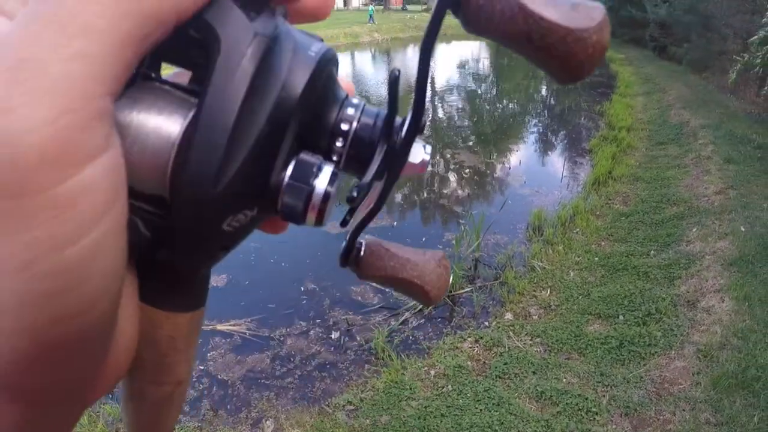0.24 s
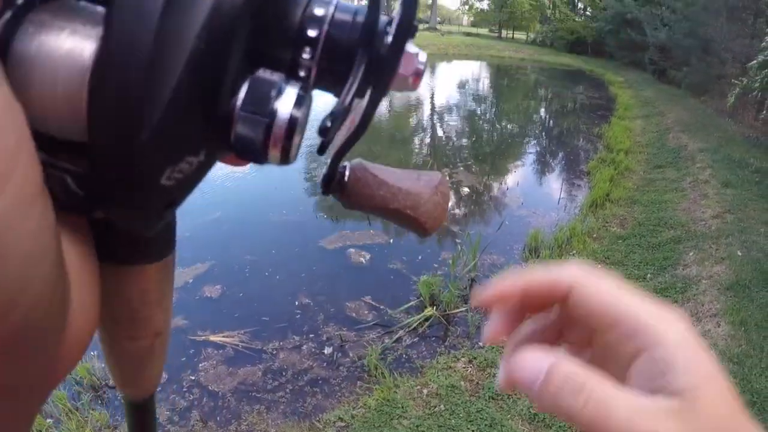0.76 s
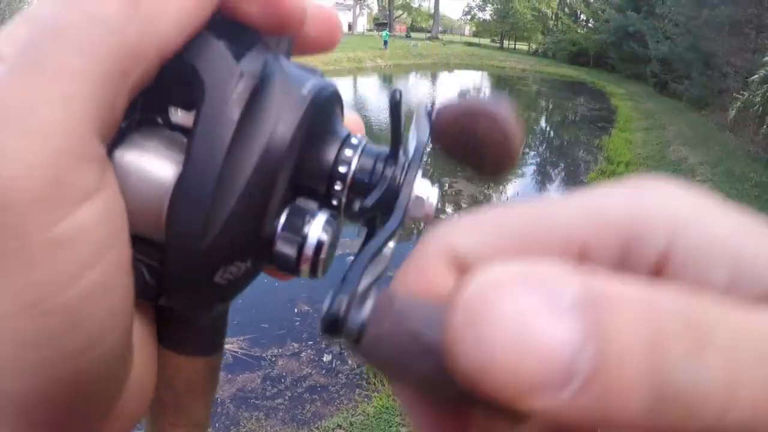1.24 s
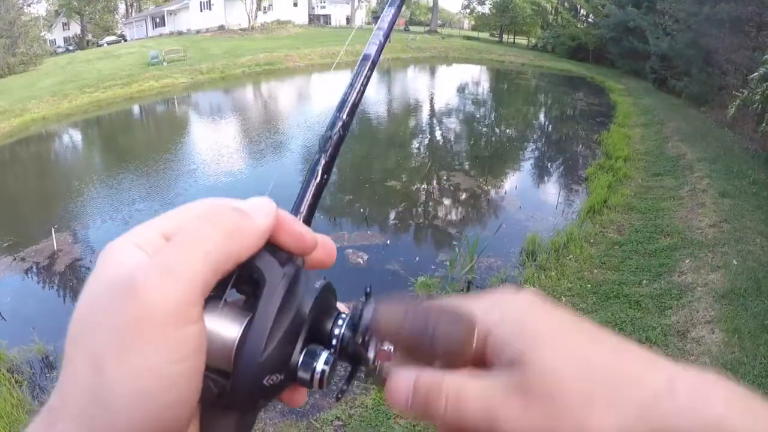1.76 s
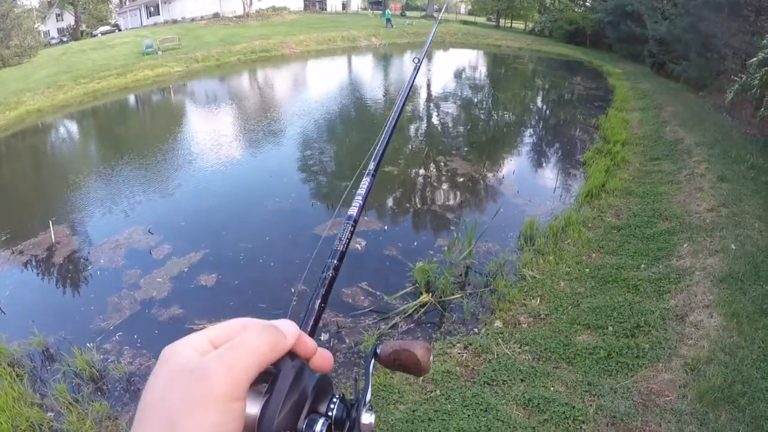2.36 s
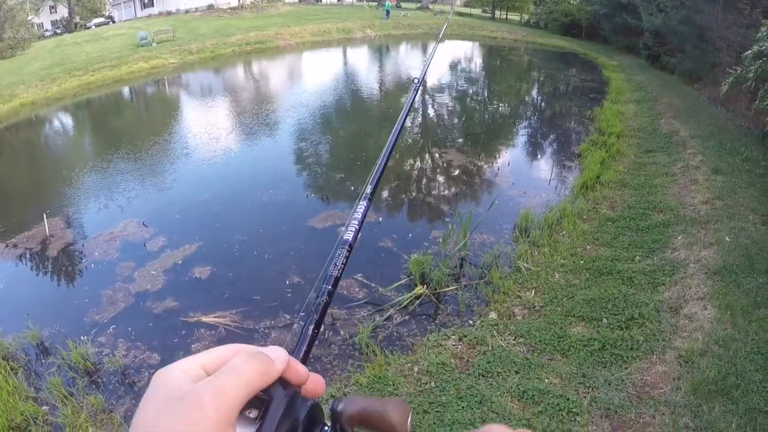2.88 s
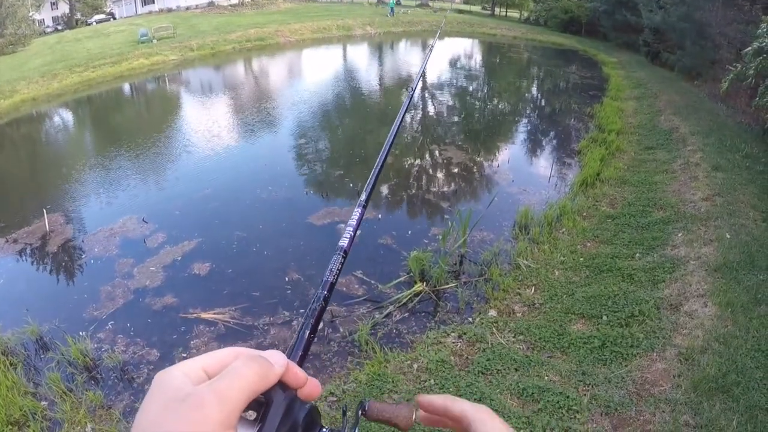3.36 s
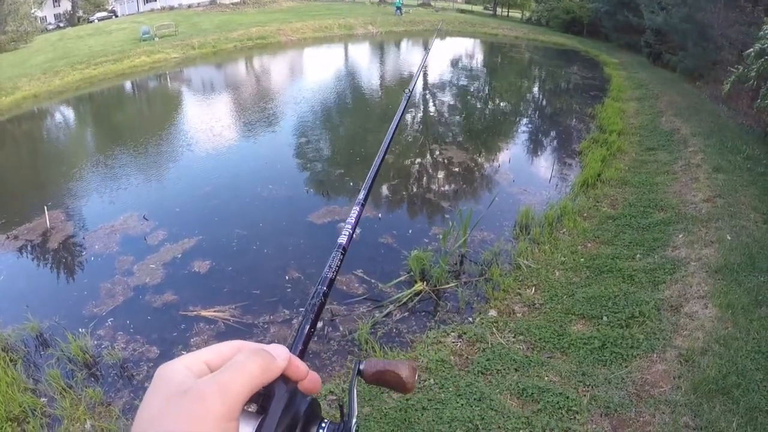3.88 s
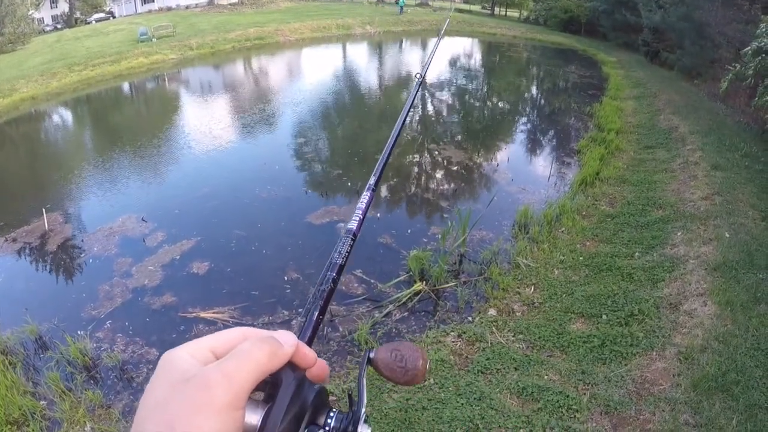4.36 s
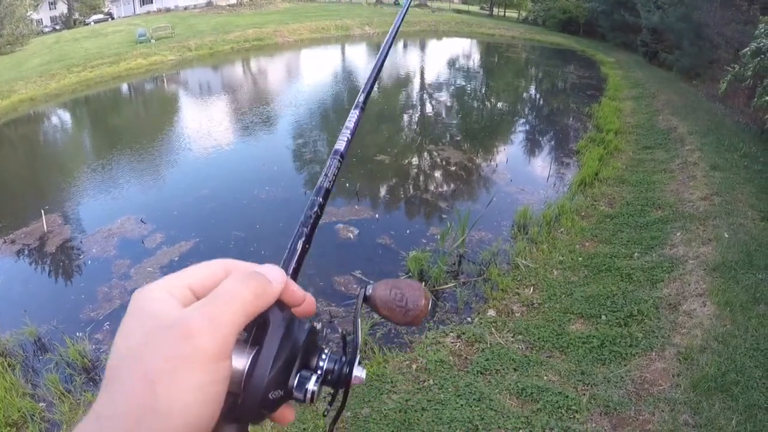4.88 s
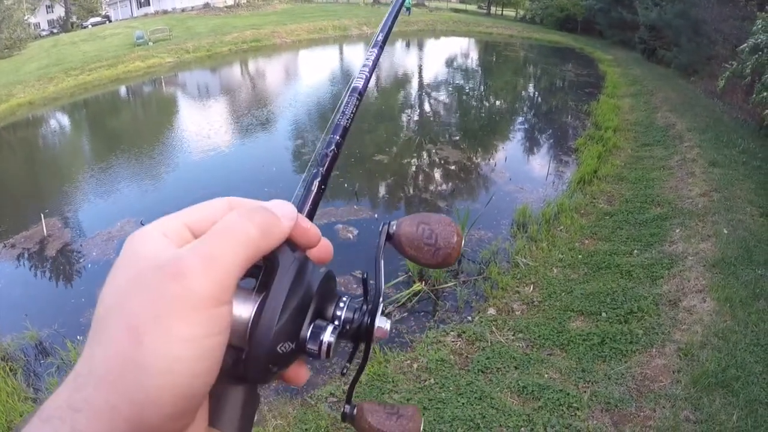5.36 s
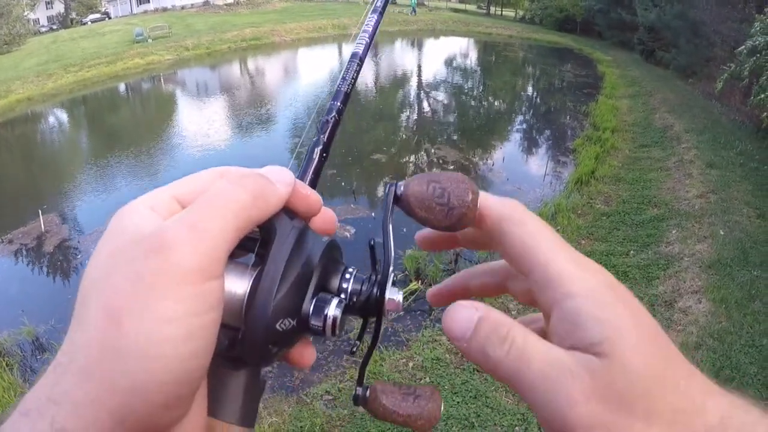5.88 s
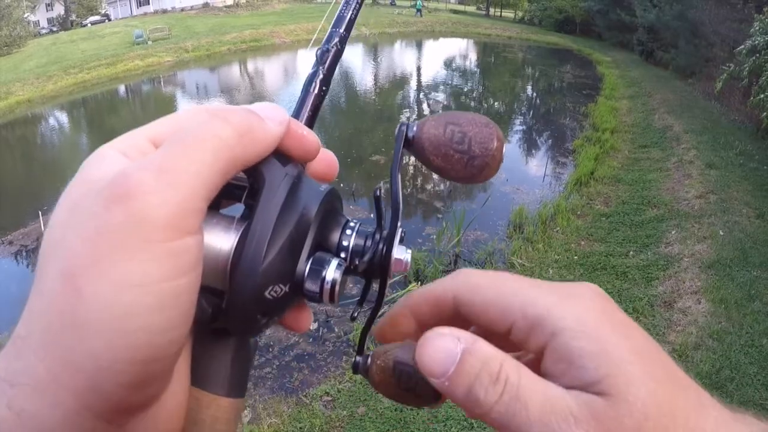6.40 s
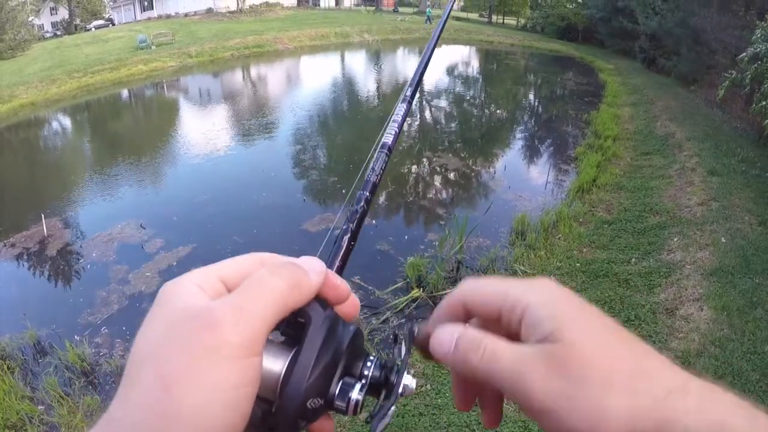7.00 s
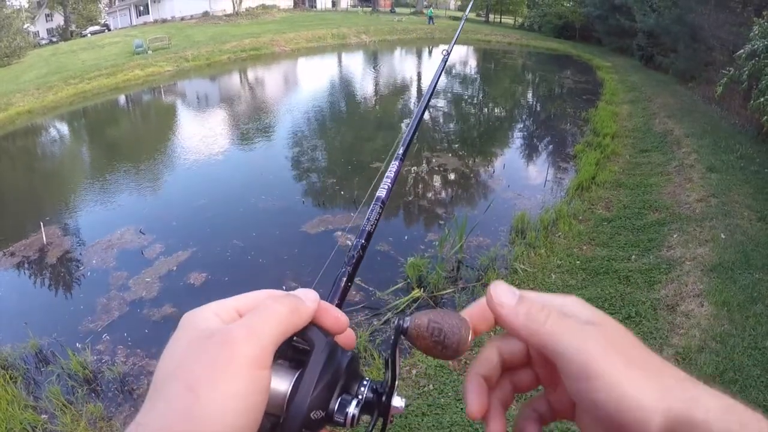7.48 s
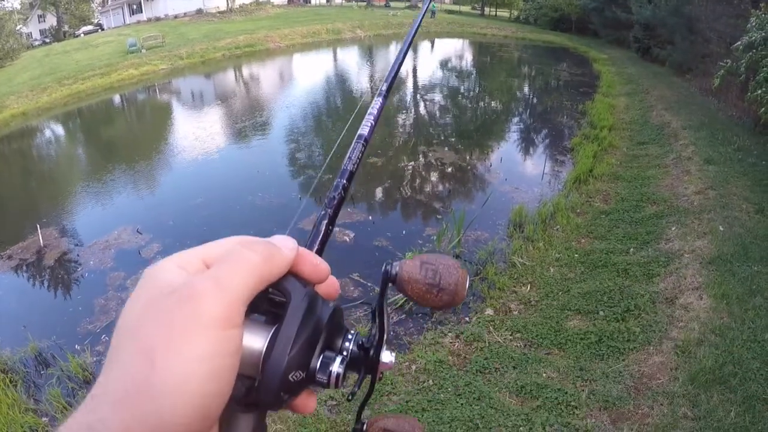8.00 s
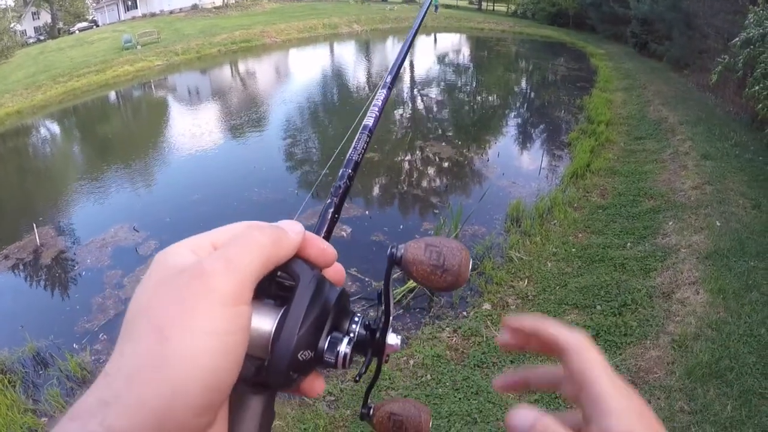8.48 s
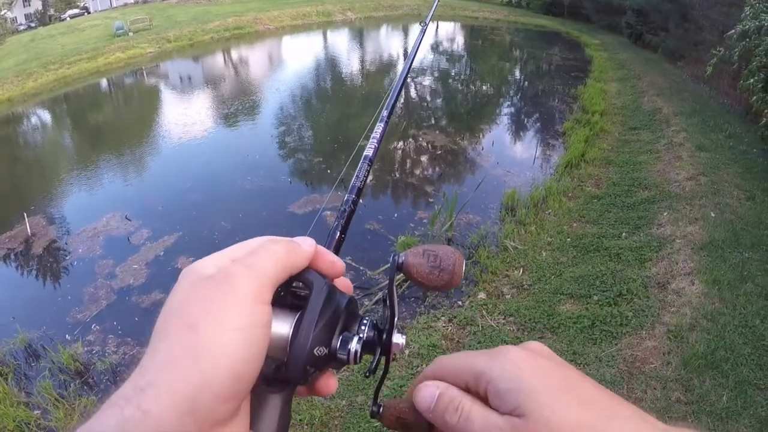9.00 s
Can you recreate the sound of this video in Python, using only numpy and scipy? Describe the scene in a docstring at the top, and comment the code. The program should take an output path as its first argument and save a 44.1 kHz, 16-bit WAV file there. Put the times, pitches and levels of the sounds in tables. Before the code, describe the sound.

Outdoors beside a pond, a distant vehicle holds a low droning exhaust note, then sweeps up to a buzzing, raspy pull. It drops at an upshift with a soft puff and spits, throbs on, shifts again lower and fades away. Houses and trees echo it faintly. Early on, fingers faintly brush a fishing reel, which clicks sharply close to the microphone, right of centre. Wind rumble lulls, then returns in small gusts.

```python
"""Vehicle receding from a pond

A six-cylinder vehicle accelerates some way off, shifts up twice and fades into the distance.
The exhaust note is a harmonic series on the firing rate, with orders between the harmonics and spurts of
gas noise; delayed copies are its echoes off houses and trees. Coloured noise gives the road haze, the light
wind on the microphone, the leaves and a faint hiss. Close by, fingers brush a fishing reel, whose clicks
excite a bank of decaying resonances."""
import sys
import numpy as np
from scipy import signal
from scipy.fft import rfft, irfft, next_fast_len
from scipy.io import wavfile

SR = 44100
rng = np.random.default_rng(int(sys.argv[2]) if len(sys.argv) > 2 else 0)


def pcm_store(signal):
    """Save signal as 16-bit PCM."""
    levels = np.round(np.clip(np.atleast_2d(signal), -1, 1) * 32767)
    wavfile.write(sys.argv[1], SR, levels.astype(np.int16).T)


N = 407469
T = np.arange(N) / SR   # time axis, s
PADDED = next_fast_len(N, True)
BINS = np.maximum(np.arange(PADDED // 2 + 1) * SR / PADDED, 1)   # frequency axis, Hz


# Engine speed: a slow pull, a run-up and two upshifts. Each row: time [s], firing rate [Hz].
ENGINE_SPEED = [(0, 86.75), (.14, 96.3), (.36, 100.7), (.6, 103.6), (.8, 104.9), (2.2, 106.6),
                (2.89, 108.3), (3.05, 130), (3.29, 179.1), (3.42, 195.2), (3.55, 205.3), (3.88, 213.1),
                (4.3, 225.9), (4.8, 235.6), (4.99, 238), (5.06, 224.7), (5.17, 193.7), (5.42, 165.5),
                (6.37, 175.8), (6.55, 172.7), (6.84, 169.2), (7.08, 141.6), (7.3, 140.2), (7.6, 130.7),
                (7.9, 128.9), (8.4, 117.3)]
# The two clean tones of the exhaust note. Each row: time [s], firing tone [dB], its octave [dB].
TONE_LEVELS = [(0, -25, -39.5), (.12, -18.5, -40.5), (.38, -26, -31.5), (.6, -18, -38.5),
               (2.03, -18.5, -38), (2.9, -19, -36), (3.2, -25, -43), (3.6, -23, -37.5), (4.07, -22, -42),
               (4.3, -25.5, -34.5), (4.98, -31, -35.5), (5.06, -25, -31.5), (5.17, -22, -42.5),
               (5.28, -21.5, -45), (5.42, -35, -43), (6.43, -31.5, -49.5), (6.62, -48, -54.5),
               (6.85, -43.5, -62), (7.08, -36, -45.5), (7.45, -42, -48), (7.95, -44.5, -55.5),
               (8.35, -52, -51), (8.7, -62, -60.5), (9.24, -77, -60)]
# The octave sags now and then. Each row: time [s], depth [dB], half length [s].
OCTAVE_SAGS = [(2.09, -13, 0.044), (2.617, -14, 0.11), (3.19, -17, .04), (4.038, -13, 0.029),
               (4.475, -18, 0.018), (5.573, -12.5, 0.13)]
# Exhaust colour for the overtones. Each row: frequency [Hz], gain [dB].
OVERTONE_COLOUR = [(200, -28), (300, -3), (360, -1), (425, -5.5), (490, 1), (600, -5), (700, -3),
                   (880, -13), (1100, -33.5), (1600, -39.5)]
# Orders between the firing tones, from unequal cylinders. Each entry: order [sixths of the firing rate].
UNEVEN_SIXTHS = [3, 4, 5, 7, 8, 9, 10, 11, 13, 14, 15, 16, 17, 20, 22]
# Relative strength of each of those orders. Each entry: gain [dB].
UNEVEN_STRENGTH = [3.5, -2, 0, -3.5, 2.5, 4, -1, 1, -5.5, -4.5, -3, 0, -6, 2, 0]
# Exhaust colour for those orders. Each row: frequency [Hz], gain [dB].
UNEVEN_COLOUR = [(30, -29), (80, -33.5), (126, -19), (153, 3.5), (190, -4), (240, -12.5), (280, -15.5),
                 (310, -24.5), (350, -34.5), (470, -12), (570, -16.5), (700, -27.5), (900, -29)]
# Turbulent gas that leaves the pipe with each firing. Each row: frequency [Hz], density [dB per Hz].
GAS_COLOUR = [(400, -21.5), (560, 2), (720, 3.5), (850, 9.5), (940, -2.5), (1040, -19), (1300, -29)]
RASP_DB, EDGE_DB, UNEVEN_DB = -43, -13, -37   # on a light throttle, at the starting distance
GONE_S, FADE_DB_PER_S = 7.28, 8.5   # from here on the rasp and the uneven firing die away
RATTLE_DB = -1.5   # the part of the gas that repeats with each engine cycle, against the random part
DIP_SHARE = 0.2   # how much of each dip in the firing tone the overtones share
OVERRUN_AT_S, OVERRUN_S, BURBLE_DB = 5.24, 0.12, 6   # burble of the overtones while the revs fall
WALL_S, WALL_DB = 0.0596, -21.5   # one house front throws the firing tone back, so it beats in the glides
FAR_ECHO_S, FAR_ECHO_DB = 0.3, -21   # the far tree line holds on to the old pitch after a change of speed


def exhaust(gas_db, flutter_db, jitter, spurt_sharpness):
    """Harmonic series of periodic firing, six per cycle, with sub-orders and modulated turbulence noise."""
    firing_hz, = in_time(ENGINE_SPEED)
    tone_db, octave_db = in_time(TONE_LEVELS)
    rasp_lift_db, edge_lift_db, uneven_lift_db, gas_lift_db, throb_depth = throttle()
    receding_db = spreading_db() - FADE_DB_PER_S * np.maximum(T - GONE_S, 0)
    rasp_db = RASP_DB + rasp_lift_db + receding_db
    uneven_db = UNEVEN_DB + uneven_lift_db + receding_db
    edge_db = EDGE_DB + edge_lift_db
    phase = 2 * np.pi * np.cumsum(firing_hz) / SR + jitter * drift(23)
    # under load every third firing hits harder, so the top of the note throbs
    throb = np.clip(throb_depth, 0, 1) * np.cos(phase / 3)
    air_path = np.sqrt(1 + T / DOUBLING_S)

    def partial(order, db, offset):
        """Scintillation: moving air makes each order shimmer, more when high or far away."""
        hz = order * firing_hz
        high = np.interp(hz, [570, 680], [0, 1])
        scatter = air_path * np.minimum(hz / 450, 1.2)
        shimmer_db = 1.15 * scatter * drift(9)
        wander = 0.2 * scatter * drift(12)   # radians
        gain = from_db(db + high * edge_db + shimmer_db) * (1 + high * throb)
        return gain * np.cos(order * phase + wander + offset)

    tone = from_db(tone_db + flutter_db * drift(24)) * np.cos(phase)
    sag_db = sum(bell(at, depth_db, length) for at, depth_db, length in OCTAVE_SAGS)
    upper = partial(2, octave_db + sag_db, np.pi / 2)
    # the overtones crest together, one pulse per firing
    for k in range(3, 12):
        upper += partial(k, rasp_db + at_hz(OVERTONE_COLOUR, k * firing_hz), np.pi)
    uneven = 0
    for sixths, strength_db in zip(UNEVEN_SIXTHS, UNEVEN_STRENGTH):
        order = sixths / 6
        order_db = uneven_db + strength_db + at_hz(UNEVEN_COLOUR, order * firing_hz)
        uneven += partial(order, order_db, rng.uniform(0, 2 * np.pi))

    # a short spurt of gas with each firing makes the note buzz
    spurts = (1 + throb) * np.exp(spurt_sharpness * np.cos(phase))
    gas = noise(GAS_COLOUR) + from_db(RATTLE_DB) * rattle(phase, change_hz=1.83)
    upper += from_db(rasp_db + gas_db + gas_lift_db) * rms_one(spurts * gas)

    # the burble swings once per engine cycle
    burble_db = bell(OVERRUN_AT_S, BURBLE_DB, OVERRUN_S) * np.cos(phase / 6)
    dips_db = dropouts_db()
    upper *= from_db(burble_db + DIP_SHARE * dips_db)
    beating = from_db(dips_db) * (tone + from_db(WALL_DB) * delayed(tone, WALL_S))
    far_echo = from_db(FAR_ECHO_DB) * delayed(tone, FAR_ECHO_S)
    return np.sqrt(2) * (beating + far_echo + uneven + upper + echoes(upper))


# The driver presses the throttle. Each row: start [s], end [s], opening time [s], lift of the rasp [dB],
# of the hard edge above about 600 Hz [dB], of the uneven firing [dB], of the gas [dB], throb [0-1].
THROTTLE_PULLS = [(0.026, 0.19, 0.055, 9, -10, -12, 15, 0.2), (0.448, 1.442, .4, -4, 18.5, -0.5, 21, 0.2),
                  (2.904, 4.074, 0.19, 10.5, 6.5, 6.5, 10, .2),
                  (4.102, 5.147, 0.44, 18.5, 4.5, 12.5, 5, 0.3), (5.336, 6.43, .27, 6, 17, 3, 18, 0.74),
                  (6.972, 7.357, 0.064, 5, 15.5, -2.5, 12, 0.6)]
THROTTLE_CLOSE_S = 0.21   # decay time constant


def throttle():
    """Load envelope: each pull ramps up, holds and relaxes exponentially, scaling four lifts and the throb."""
    lifts = np.zeros((5, N))
    for start, end, open_s, *lift in THROTTLE_PULLS:
        opening = np.clip((T - start) / open_s, 0, 1)
        closing = np.exp(-np.maximum(T - end, 0) / THROTTLE_CLOSE_S)
        lifts += np.outer(lift, opening * closing)
    return lifts


DOUBLING_S = 2.57   # the vehicle is twice as far off after this time


def spreading_db():
    """Spherical spreading: pressure falls as one over the distance, which grows steadily."""
    return -20 * np.log10(1 + T / DOUBLING_S)


def rattle(phase, change_hz, size=160, count=3):
    """Cyclic repetition: a slowly changing pattern returns every six firings, a dense comb of partials."""
    place = phase / (12 * np.pi) % 1 * size   # position within the engine cycle
    total = 0
    for pattern in rng.standard_normal((count, size)):
        closed = np.append(pattern, pattern[0])
        total += drift(change_hz) * np.interp(place, np.arange(size + 1), closed)
    return coloured(total, GAS_COLOUR)


# The firing tone drops out for a moment, mostly in the glides. Each row: time [s], depth [dB].
TONE_DIPS = [(3.149, -8.5), (3.232, -31), (3.42, -11), (4.355, -12), (5.095, -11), (5.14, -20), (5.21, -12),
             (5.345, -12), (5.935, -14)]


def dropouts_db():
    """Amplitude modulation by brief bell-shaped dips, in decibels."""
    return sum(bell(at, depth_db, 0.017) for at, depth_db in TONE_DIPS)


# Reflections from houses and trees. Each row: delay [s], level re the direct sound [dB].
REFLECTIONS = [(.062, -16), (0.114, -17), (0.186, -17.5), (0.29, -15.5)]


def echoes(x):
    """Interference: late copies beat against the direct sound while the pitch glides."""
    return sum(from_db(db) * delayed(x, delay) for delay, db in REFLECTIONS)


# The exhaust spits on the closed throttle. Each row: time [s], peak level [dB], half length [s].
EXHAUST_SPITS = [(5.038, -40, 0.008), (5.099, -39, .012), (5.144, -33, 0.0035), (5.185, -40, .006)]


def gear_change(at, level_db, length):
    """Pulsed flow noise: a soft, low puff as the throttle closes, and spits around it as the revs fall."""
    # each row: frequency [Hz], density [dB per Hz]
    puff = noise([(25, -21), (65, 2.5), (130, -9), (230, 5), (330, -13.0), (600, -15), (1200, -31)])
    spits = sum(swell(*spit) for spit in EXHAUST_SPITS) * noise(GAS_COLOUR)
    return swell(at, level_db, length) * puff + spits


# Left-right difference of the microphone pair for distant sound.
# Each row: frequency [Hz], level re the sum [dB], phase [radians].
SIDE_RESPONSE = [(60, -51, -5), (130, -24, 1.6), (215, -24, 0), (344, -16.5, -1), (473, -11.5, 0.15),
                 (594, 2, 0.94), (710, 4.5, -1.5), (947, 8.5, -2.5), (1220, 7.5, -2.5), (1550, 8, -4.5),
                 (1850, -3, -5), (2960, -22.5, 10)]


def with_side(x):
    """Side from a filtered copy of the sum: the left-right difference is strongest near one kilohertz."""
    ports = np.array(SIDE_RESPONSE)
    phase = at_hz(ports[:, ::2], BINS)
    response = from_db(at_hz(ports, BINS)) * np.exp(1j * phase)
    return stereo(x, filtered(x, response))


# Rushing air. Each row: frequency [Hz], density [dB per Hz].
ROAR_COLOUR = [(150, 0), (250, 5), (400, 3), (550, -0.5), (750, 4), (880, 4), (1050, -5.5), (1250, -15),
               (1600, -24)]
# Tyre hiss. Each row: frequency [Hz], density [dB per Hz].
TYRE_COLOUR = [(900, -10), (1200, 1), (1420, 5.5), (1650, 0.5), (2000, 3), (2400, -2.5), (2800, -15),
               (3400, -26), (5000, -26), (8000, -36)]
# Course of the tyre hiss. Each row: time [s], level before the trim [dB].
TYRE_LEVEL = [(0.0, -43), (2.44, -47), (3.03, -51), (5.56, -48), (5.97, -44.5), (6.79, -48.5),
              (7.28, -47.5), (8.5, -49.5), (9.24, -53.5)]
ROAR_DB = -36.5   # at the starting distance


def road(tyre_trim_db, flicker_db):
    """Broadband flow and contact noise: the air roar sinks with distance, the tyre hiss swells and sinks."""
    tyre_db, = in_time(TYRE_LEVEL)
    roar = haze(ROAR_COLOUR, ROAR_DB + spreading_db() + flicker_db * drift(10))
    return roar + haze(TYRE_COLOUR, tyre_db + tyre_trim_db + flicker_db * drift(7.9))


# Unrelated part of the left-right difference for diffuse sound.
# Each row: frequency [Hz], level re the sum [dB].
DIFFUSE_DIFFERENCE = [(60, -8), (200, -2.5), (450, -5), (750, 2.5), (1000, 9.5), (1220, 9.5), (1500, -10),
                      (2000, -11.5), (3200, -0.5), (5000, 2.5)]


def haze(spectrum, level_db):
    """Partial coherence: noise partly from the road, partly scattered from all around."""
    gain = from_db(level_db)
    scattered = filtered(gain * noise(spectrum), from_db(at_hz(DIFFUSE_DIFFERENCE, BINS)))
    return with_side(gain * noise(spectrum)) + stereo(0, scattered)


# Clicks of the reel's catch. Each row: time [s], impulse level [dB].
REEL_CLICKS = [(1.109, -25), (1.114, -37), (1.1175, -42), (1.1224, -40), (1.284, -50), (3.6374, -47.5)]
# Modes of the reel body. Each row: frequency [Hz], gain [dB], decay time by 60 dB [s].
REEL_MODES = [(770, -3, 0.03), (1416.6, -5, 0.013), (2330, 1, 0.029), (2690, 4, 0.012), (3080, 5, 0.01),
              (3640, -7, 0.009), (4030, -8, 0.014), (4640, -10, 0.0087), (5300, -14, .003),
              (7600, -12, .005), (9200, -22, .003), (11500, -27, .002)]


def reel(pan_db, lag_s):
    """Modal synthesis: catch impulses ring a small body, louder on the right and later on the left."""
    clicks, out = np.zeros(N), np.zeros(N)
    for s, db in REEL_CLICKS:
        clicks[round(s * SR)] = from_db(db)
    for k, (hz, db, t60) in enumerate(REEL_MODES):
        r = from_db(-60 / (t60 * SR))   # pole radius
        w = 2 * np.pi * hz / SR   # radians per sample
        # the tiny offset keeps the filter clear of slow denormal numbers
        ringing = signal.lfilter([0, np.sin(w)], [1, -2 * r * np.cos(w), r * r], clicks + 1e-18)
        out += (-1) ** k * from_db(db) * ringing
    return np.array([delayed(out, lag_s, out[0]) * from_db(-pan_db), out * from_db(pan_db)])


def grip(at, level_db, length, grain_db):
    """Friction noise: fingers shift on the reel with a faint brush, grainy by fast level modulation."""
    # each row: frequency [Hz], density [dB per Hz]
    brush = noise([(3000, -23), (4600, 2), (5400, 5), (6500, -7), (9000, -21)])
    return swell(at, level_db, length) * rms_one(brush * from_db(grain_db * drift(90)))


# The wind drops to a lull and picks up again. Each row: time [s], level [dB].
WIND_LEVEL = [(0, -33.5), (4, -34.5), (5.4, -43.5), (6.1, -50), (6.6, -65), (7.4, -70), (7.6, -56),
              (7.95, -44), (9, -34)]
# Wind rumble. Each row: frequency [Hz], density [dB per Hz].
RUMBLE_COLOUR = [(12, -3.5), (28, 2), (45, -2.5), (70, -3.5), (110, -6), (170, -14), (260, -24.5),
                 (500, -33)]
# Gusts that reach the microphone. Each row: time [s], peak level [dB], half length [s].
WIND_GUSTS = [(8.171, -40, .045), (8.33, -42, 0.036), (8.435, -44, 0.036), (8.515, -34, .025),
              (8.642, -43, .05), (9.029, -43, 0.043), (9.19, -41.5, 0.023)]
# Buffeting in the gusts. Each row: frequency [Hz], density [dB per Hz].
BUFFET_COLOUR = [(25, -9), (55, 0.5), (100, 2), (170, -3), (260, -9), (370, -12.5), (600, -34)]


def wind(side_db):
    """Turbulent pressure noise: a low rumble nearly alike on both ports, with gusts that buffet higher up."""
    level_db, = in_time(WIND_LEVEL)
    side_gain = from_db(side_db)
    rumble = from_db(level_db) * stereo(noise(RUMBLE_COLOUR), side_gain * noise(RUMBLE_COLOUR))
    gusts = sum(swell(*gust) for gust in WIND_GUSTS)
    return rumble + gusts * stereo(noise(BUFFET_COLOUR), side_gain * noise(BUFFET_COLOUR))


# Breeze in the trees. Each row: time [s], level of the sum before panning [dB].
BREEZE_LEVEL = [(0, -58.5), (1.7, -59), (3, -65), (5, -61), (5.6, -65), (7.5, -66.5), (9.24, -66)]
# Leaf rustle. Each row: frequency [Hz], density [dB per Hz].
LEAF_COLOUR = [(1500, -36), (2300, 7), (3000, 1), (3700, -4.5), (5000, -8.5), (7000, -21.5)]


def trees(pan_db):
    """Many small impacts merge into noise: a soft, wide rustle of leaves, more to the right."""
    level_db, = in_time(BREEZE_LEVEL)
    rustle = stereo(noise(LEAF_COLOUR), 0.88 * noise(LEAF_COLOUR))
    return from_db(level_db) * rustle * from_db([[-pan_db], [pan_db]])


# Steady hiss. Each row: frequency [Hz], density [dB per Hz].
HISS_COLOUR = [(1880, -18), (3200, -0.5), (5040, -1), (7540, 0), (10100, -1), (13200, -11), (14800, -18.5)]


def faint_hiss(level_db):
    """Stationary noise: independent sum and difference make it wide, a touch stronger on the right."""
    wide = stereo(noise(HISS_COLOUR), noise(HISS_COLOUR))
    return from_db(level_db) * wide * from_db([[-1], [0.4]])


def from_db(db):
    """Logarithmic level: decibels to amplitude gain."""
    return 10 ** (np.asarray(db) / 20)


def rms_one(x):
    """Normalisation to unit root mean square."""
    return x / np.sqrt(np.mean(x ** 2) + 1e-20)


def in_time(rows):
    """Linear interpolation of each column of a curve at every sample."""
    s, *columns = np.transpose(rows)
    return [np.interp(T, s, c) for c in columns]


def at_hz(points, hz):
    """Interpolation of a spectrum on a logarithmic frequency axis."""
    points = np.array(points)
    return np.interp(np.log(hz), np.log(points[:, 0]), points[:, 1])


def drift(rate_hz):
    """Low-passed random process: a slow wander of spread 1, made at every 40th sample."""
    r = np.exp(-80 * np.pi * rate_hz / SR)
    slow = signal.lfilter([1], [1, -2 * r, r * r], rng.standard_normal(N // 40 + 2002))
    slow = slow[2000:]   # leave out the filter's start
    return np.interp(np.arange(N) / 40, np.arange(len(slow)), rms_one(slow))


def bell(at, height, length):
    """Gaussian envelope of the given height, centred on a time."""
    return height * np.exp(-((T - at) / length) ** 2)


def swell(at, level_db, length):
    """Gaussian rise and fall of gain up to a peak level."""
    return bell(at, from_db(level_db), length)


def delayed(x, delay, before=0):
    """Propagation delay: a copy that arrives later."""
    return np.interp(T - delay, T, x, left=before)


def filtered(x, response):
    """Linear filtering: multiplication by a frequency response."""
    return irfft(rfft(x, PADDED) * response, PADDED)[:N]


def coloured(x, spectrum):
    """Spectral shaping to a colour that dies away above its last point; rms 1."""
    roll_off = 1 + (BINS / spectrum[-1][0] / 2) ** 4
    return rms_one(filtered(x, from_db(at_hz(spectrum, BINS)) / roll_off))


def noise(spectrum):
    """Shaped white noise of the given colour; rms 1."""
    return coloured(rng.standard_normal(N), spectrum)


def stereo(mid, side):
    """Sum-and-difference matrix: left and right from mid and side."""
    return np.array([mid + side, mid - side])


def scene():
    """Superposition of vehicle, road haze, reel, wind, leaves and a steady faint hiss."""
    vehicle = exhaust(gas_db=-22, flutter_db=0.77, jitter=0.055, spurt_sharpness=0.46)
    vehicle = vehicle + gear_change(at=5.05, level_db=-24.5, length=0.034)
    distant = with_side(vehicle) + road(tyre_trim_db=-1.0, flicker_db=1.08)
    hands = reel(pan_db=5.0, lag_s=0.000088) + grip(at=0.848, level_db=-60, length=0.04, grain_db=3)
    air = wind(side_db=-12.5) + trees(pan_db=6.0)
    return distant + hands + air + faint_hiss(level_db=-61.5)


def record(dry):
    """Zero-phase low-pass filtering: the top is cut steeply near 14900 Hz."""
    low_pass = signal.butter(16, 14900, fs=SR, output="sos")
    return signal.sosfiltfilt(low_pass, dry)


dry = scene()
out = record(dry)
pcm_store(out)
```